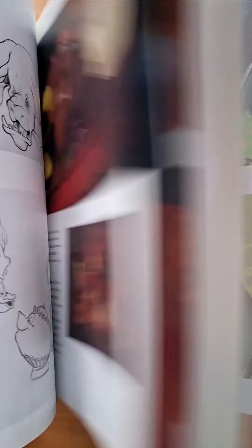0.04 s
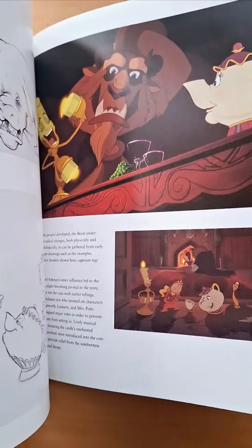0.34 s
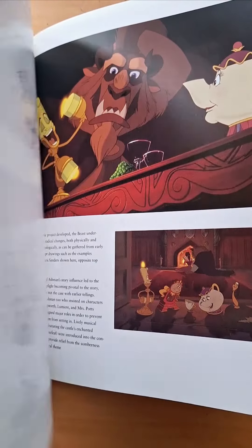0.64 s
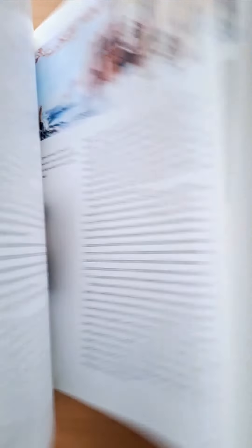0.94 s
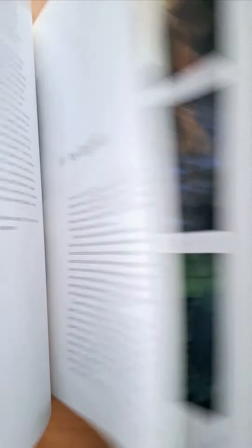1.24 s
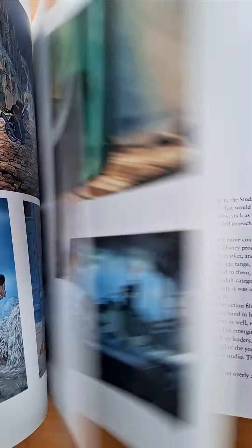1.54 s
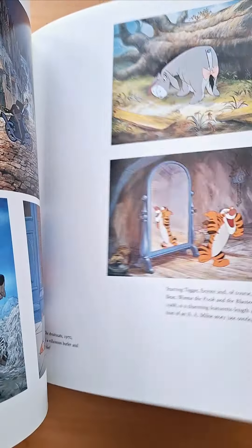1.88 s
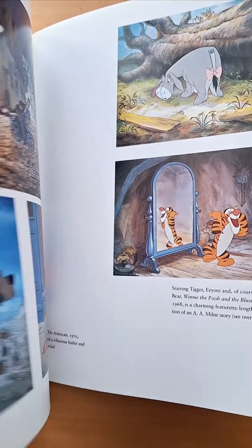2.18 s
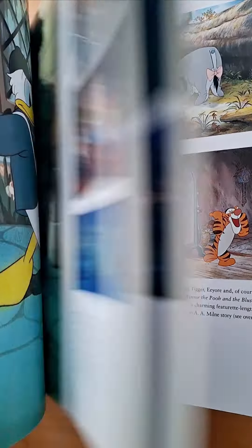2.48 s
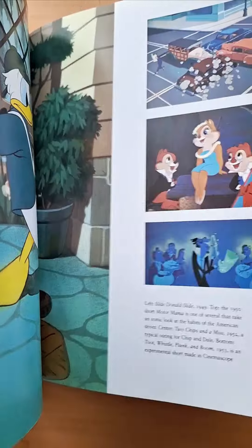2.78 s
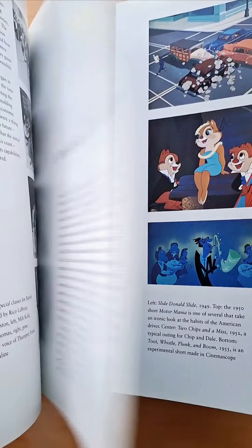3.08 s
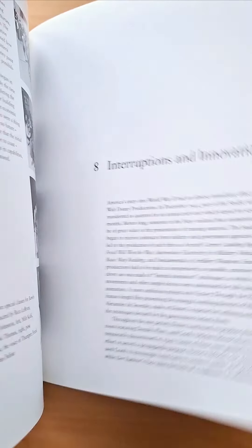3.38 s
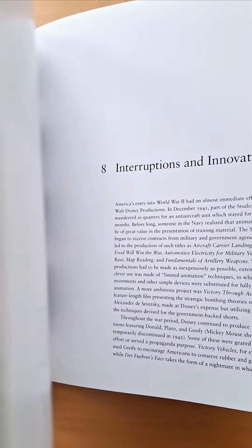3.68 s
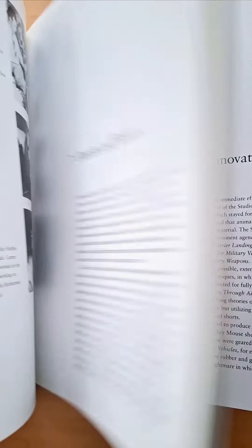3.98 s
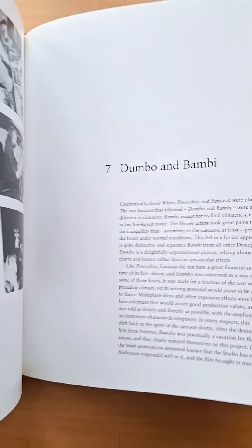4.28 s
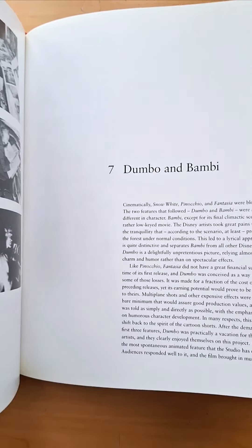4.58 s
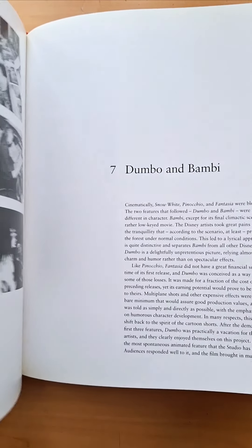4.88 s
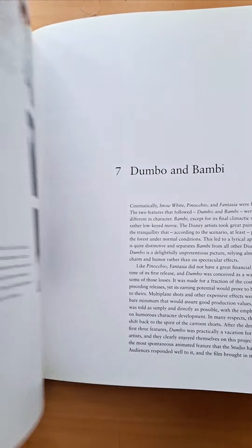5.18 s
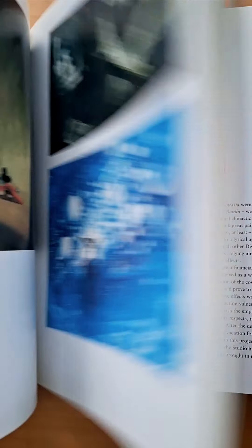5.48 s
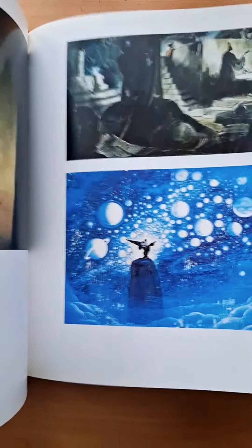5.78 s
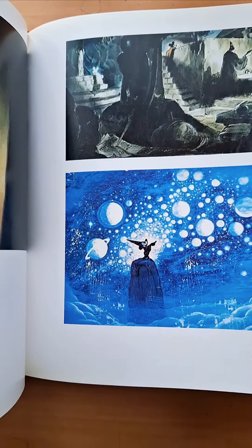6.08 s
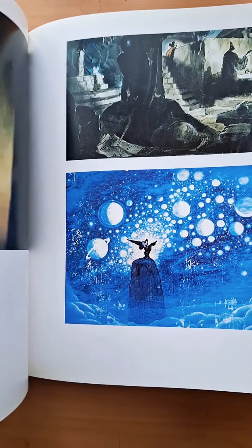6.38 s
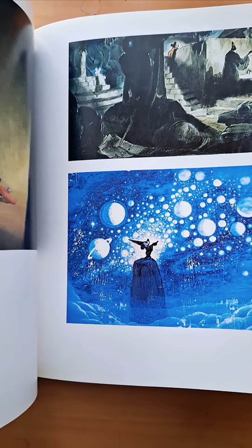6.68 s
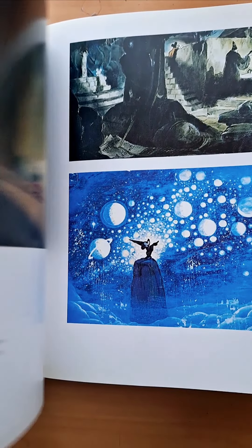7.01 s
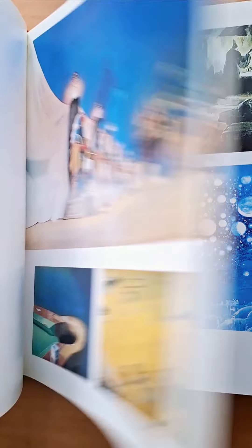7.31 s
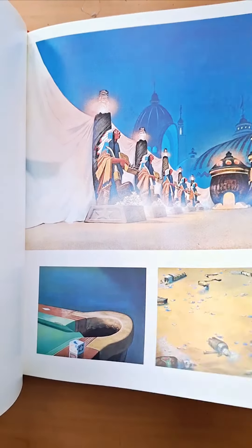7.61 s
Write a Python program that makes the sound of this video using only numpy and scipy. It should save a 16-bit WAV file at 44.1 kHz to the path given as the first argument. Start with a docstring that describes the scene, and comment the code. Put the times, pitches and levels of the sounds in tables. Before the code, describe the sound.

Stiff, glossy pages of a large book are turned close by, with papery swishes, hollow flaps, slaps and a couple of thumps.

```python
"""Hands leaf through a large book of stiff, glossy paper on a wooden table, close to the microphone.
A small room rumbles softly throughout. First a sheet slides with a hiss, swings through the air and
buckles with a hollow flap. Its edge ticks, it lands with a slap and a knock, and the book bumps the table.
More pages follow, some fluttering or rasping. Near 4.4 s and 5.9 s a bundle lands with a heavier thump,
and near 6.8 s a last sheet slides and ticks."""
import sys
import numpy as np
from scipy import signal
from scipy.fft import rfft, irfft, next_fast_len
from scipy.io import wavfile
from scipy.ndimage import uniform_filter1d, map_coordinates

SR = 44100
rng = np.random.default_rng(int(sys.argv[2]) if len(sys.argv) > 2 else 0)


def digitize_waveform(pressure):
    """Quantize a signal to 16-bit integers and store it at the path in sys.argv[1].

    Rows of a 2-D input are taken as channels; values are limited to [-1, 1].
    """
    field = np.atleast_2d(pressure).T
    bounded = np.clip(field, -1, 1)
    quanta = np.round(bounded * 32767).astype(np.int16)
    wavfile.write(sys.argv[1], SR, quanta)


N = 337365
HIT = int(.7 * SR)  # samples set aside for one short sound or echo
SLIDE_RELEASE_S, SWING_RISE_S = 0.055, .014  # time to fall 20 dB, time to climb 20 dB

# How alike left and right are (1 = the same) for rumble, paper and room air: pitch_hz, likeness
RUMBLE_LIKENESS = [(30, 0.87), (150, 1), (500, 0.61), (2000, 0.067), (10000, 0.042)]
PAPER_LIKENESS = [(300, 0.91), (750, 0.56), (1300, 0.24), (2500, 0.079), (12000, 0.087)]
ROOM_LIKENESS = [(150, 1), (700, 0.9), (1300, 0.046), (10000, 0.018)]


def amp(db):
    """Turn decibels into a gain to multiply by."""
    return 10 ** (np.asarray(db) / 20)


def unit(x):
    """Scale a sound to an average power of 1."""
    return x / np.sqrt(np.mean(x ** 2) + 1e-20)


def along(points, hz):
    """Read between (pitch_hz, value) points on a logarithmic pitch scale."""
    pitches, values = np.transpose(points)
    return np.interp(np.log(hz + 1), np.log(pitches + 1), values)


def wobble(rate):
    """A smooth random curve through rate points a second."""
    points = rng.standard_normal(int(N * rate / SR) + 4)
    return map_coordinates(points, [np.arange(N) * rate / SR])


def swell(start_s, rise_s, hold_s, release_s):
    """Gain of one movement: full at start_s, it climbs 20 dB per rise_s and falls 20 dB per release_s."""
    t = np.arange(N) / SR - start_s
    return amp(20 * (np.minimum(t, 0) / max(rise_s, 1e-3) - np.maximum(t - hold_s, 0) / release_s))


def filtered(x, response):
    """Multiply each frequency of a sound by response(hz)."""
    n = x.shape[-1]
    padded = next_fast_len(n + SR // 10)
    return irfft(rfft(x, padded) * response(np.fft.rfftfreq(padded, 1 / SR)), padded)[..., :n]


def coloured(x, colour):
    """Give a sound a tone colour made of (pitch_hz, level_db) points."""
    return filtered(x, lambda hz: amp(along(colour, hz)))


def noise(n, likeness):
    """White stereo noise whose two sides agree as far as likeness says."""
    def shares(hz):
        angle = np.arccos(np.clip(along(likeness, hz), -1, 1)) / 2
        return np.array([np.cos(angle), np.sin(angle)])
    mid, side = filtered(rng.standard_normal((2, n)), shares)
    return np.array([mid + side, mid - side])


def click(colour, size=2048):
    """The shortest click that has this tone colour."""
    cepstrum = irfft(np.log(amp(along(colour, np.fft.rfftfreq(size, 1 / SR)))))
    cepstrum[1:size // 2] *= 2  # folding it this way packs the energy at the start
    cepstrum[size // 2 + 1:] = 0
    return irfft(np.exp(rfft(cepstrum)))


def ring(modes, soft_hz, size=4096):
    """A few resonances answer one soft push, dulled above soft_hz."""
    f = np.fft.rfftfreq(size, 1 / SR)
    body = sum((-1) ** k * amp(db) * 1j * f * width / (hz * hz - f * f + 1j * f * width)
               for k, (hz, width, db) in enumerate(modes))
    return signal.sosfilt(signal.butter(4, soft_hz, fs=SR, output="sos"), irfft(body))


def linger(modes, onset_s=0.0046, blur=.005):
    """Wavering tones ring on after a blow; blur is their width as a share of their pitch."""
    t = np.arange(HIT) / SR
    tone = np.zeros(HIT)
    for hz, db, fade_60db_s in modes:
        wander = np.cumsum(rng.standard_normal(HIT)) * np.sqrt(2 * np.pi * blur * hz / SR)
        tone += amp(db - 60 * t / fade_60db_s) * np.sin(2 * np.pi * hz * t + wander)
    return np.tile(tone * (1 - np.exp(-t / onset_s)), (2, 1))


def strike(pulse, life_s, flutter, size=4096):
    """A push and the dying flutter after it, both with the tone of pulse."""
    age = np.arange(size) / SR / life_s
    shake = noise(size, PAPER_LIKENESS) * np.exp(-age) * (1 - np.exp(-4 * age))
    shake *= flutter / np.linalg.norm(shake[0])
    shake[:, 0] += 1  # the push
    sound = signal.fftconvolve(shake, pulse[None], axes=1)
    return sound / np.abs(sound.mean(0)).max()


def in_room(x, wet_db, near, build_s=0.0011, echoes=6):
    """Add close echoes off pages and table (gain near) and the room's fading tail (level wet_db)."""
    # How long the room rings: pitch_hz, fade_60db_s
    fade_times = [(100, 0.95), (300, 0.56), (1000, 0.42), (2000, 0.46), (4000, 0.43), (14000, 0.53)]
    hz, t, bands = signal.stft(noise(HIT, ROOM_LIKENESS), SR, nperseg=256)
    fading = bands * amp(-60 * t / along(fade_times, hz)[:, None])
    tail = signal.istft(fading * (1 - np.exp(-t / build_s)), SR, nperseg=256)[1]
    answer = amp(wet_db) * tail / np.linalg.norm(tail[0])
    answer[:, 0] += 1  # the direct sound
    for side in answer:
        delays = (rng.uniform(.0002, .004, echoes) * SR).astype(int)
        side[delays] += near * rng.choice([-1, 1], echoes)
    return signal.fftconvolve(x, answer, axes=1)


def off_centre(x, lead_s):
    """A sound from one side reaches the left channel lead_s before the right."""
    return filtered(x, lambda hz: np.exp(1j * np.pi * lead_s * np.outer([1, -1], hz)))


def add(track, start_s, sound):
    """Mix a sound into the track at a given time."""
    part = track[:, max(round(start_s * SR), 0):][:, :sound.shape[1]]
    part += sound[:, :part.shape[1]]


def room_tone(level_db=-59.5):
    """A low, gently heaving rumble under a faint hiss."""
    # Tone of the quiet room: pitch_hz, level_db
    room_colour = [(15, -24.5), (25, 1.5), (42, -9.5), (70, -6), (120, -12), (145, -8), (172, -1.5),
                   (215, -12.5), (260, -13.5), (370, -23.5), (480, -32), (820, -38), (1200, -42.5),
                   (3000, -45.5), (7700, -49.5), (8800, -51.5), (11000, -47.5), (15000, -47)]
    air = coloured(noise(N, RUMBLE_LIKENESS), room_colour)
    low = filtered(air, lambda hz: 1 / (1 + (hz / 400) ** 2))
    heave = amp(3 * wobble(11) - .5)
    return amp(level_db) * unit(air + low * (heave - 1))


def slide_gains(sag_db_per_s=18):
    """How strong the hiss and scrape are over time; the hiss thins as each sheet slows."""
    # Paper slides on paper: start_s, rise_s, hold_s, hiss_db, scrape_db
    strokes = [(0.0, .01, 0.043, -75, -73), (0.465, 0.049, 0.071, -53, -52.5),
               (0.817, 0.061, .07, -73, -76.5), (0.875, .012, .009, -62, -76),
               (0.918, 0.012, 0.044, -60, -57.5), (1.194, 0.11, 0.063, -69.5, -73),
               (1.268, 0.025, 0.015, -68, -71.5), (1.322, 0.019, 0.15, -66.5, -64),
               (1.589, 0.012, 0.014, -63, -81.5), (1.645, -0.04, 0.18, -74, -71.5),
               (2.118, 0.045, 0.027, -67.5, -81.5), (2.209, 0.005, 0.044, -56.5, -58),
               (2.281, 0.064, 0.03, -64.5, -56.5), (2.375, 0.017, 0.087, -79.5, -71),
               (2.87, 0.042, 0.0072, -51.5, -60), (2.95, 0.0175, 0.013, -56.5, -42.5),
               (3.55, 0.03, 0.026, -60.5, -67.5), (3.628, 0.025, 0.083, -58.5, -51),
               (4.258, 0.15, 0.33, -69, -68.5), (4.711, 0.067, 0.029, -63.5, -61),
               (4.813, 0.07, 0.014, -59, -60.5), (4.844, 0.01, 0.044, -68.5, -64.5),
               (4.929, 0.082, 0.0081, -67.5, -61.5), (4.996, 0.2, 0.19, -77, -72),
               (5.254, 0.047, 0.016, -70.5, -76), (5.307, 0.072, .09, -80.5, -74.5),
               (6.672, 0.41, 0.055, -84, -83), (6.797, 0.061, 0.036, -58.5, -61.5),
               (6.857, 0.095, 0.02, -51.5, -53)]
    t, hiss, scrape = np.arange(N) / SR, np.zeros(N), np.zeros(N)
    for start_s, rise_s, hold_s, hiss_db, scrape_db in strokes:
        stroke = swell(start_s, rise_s, hold_s, SLIDE_RELEASE_S)
        hiss += stroke * amp(hiss_db - sag_db_per_s * np.clip(t - start_s, 0, hold_s))
        scrape += stroke * amp(scrape_db)
    return hiss, scrape


def patchy(x, depth_db, size=1024):
    """Narrow resonances come and go as the sheet changes its bend."""
    bands = signal.stft(x, nperseg=size)[2]
    patches = uniform_filter1d(rng.standard_normal(bands.shape[1:]), size=3, axis=0)  # smooth in pitch
    patches = uniform_filter1d(patches, size=6, axis=1)  # and in time
    return signal.istft(bands * amp(depth_db * np.minimum(unit(patches), 2)), nperseg=size)[1][:, :N]


def friction(colour, slips_per_s, grain_share, spread_db):
    """Countless paper fibres catch and slip: a rush with single slips standing out."""
    slips = (rng.random(N) < slips_per_s / SR) * amp(spread_db * np.minimum(rng.standard_normal(N), 2))
    fade = np.exp(-np.arange(SR // 50) / SR / 0.0028)
    power = np.abs(signal.fftconvolve(slips ** 2, fade)[:N])
    rush = patchy(noise(N, PAPER_LIKENESS), depth_db=5)
    grains = rush * np.sqrt(1 - grain_share + grain_share * power / power.mean())
    return unit(coloured(grains, colour))


def slides(hiss_gain, scrape_gain):
    """A light touch hisses; pressing on the sheet adds a lower, crinkly scrape."""
    # Tone of light and of pressed sliding: pitch_hz, level_db
    hiss_colour = [(1500, -23), (3500, 2), (5000, -0.5), (7700, 1.5), (8800, -10), (11000, -4), (15000, -7)]
    scrape_colour = [(150, -25), (400, -2), (750, 3), (1000, 0), (1400, 0), (1800, 1), (2300, -1.5),
                     (3600, -7.5), (6000, -17), (15000, -23)]
    hiss = hiss_gain * friction(hiss_colour, slips_per_s=370, grain_share=0.81, spread_db=-2.0)
    scrape = scrape_gain * friction(scrape_colour, slips_per_s=150, grain_share=0.31, spread_db=-3.5)
    grip = amp(1.5 * wobble(60))  # the sheet catches and lets go
    return in_room(grip * (hiss + scrape), wet_db=-10.5, near=0.036)[:, :N]


def swings(release_s=0.052, settle_s=0.41):
    """A turning sheet wobbles softly and fans a slowly settling draught over the microphone."""
    # A sheet swings through the air: start_s, hold_s, wobble_db, draught_db
    turns = [(0.278, 0.24, -66, -58.5), (0.445, 0.041, -39, -56), (1.159, 0.097, -52, -63),
             (1.309, 0.12, -51, -58.5), (1.472, 0.028, -50.5, -58), (1.579, 0.13, -52.5, -55),
             (1.73, 0.1, -62, -58.5), (1.868, 0.14, -56, -82), (2, 0.033, -52, -67),
             (2.089, 0.012, -57, -57), (2.883, 0.048, -60.5, -66), (2.937, 0.024, -48.5, -47),
             (3.461, 0.07, -49.5, -66.5), (3.624, 0.017, -45.5, -52), (4.4, 0.033, -60, -51.5),
             (5.843, 0.056, -61.5, -71.5), (5.947, 0.036, -42.5, -50), (6.76, 0.054, -63, -72.5)]
    # Tone of the wobbling sheet and of air on the microphone: pitch_hz, level_db
    sheet_colour = [(60, -6.5), (110, -19.5), (220, -0.5), (350, 2), (580, -2.5), (790, -4.5),
                    (1000, -18.5), (1500, -24), (2500, -46), (6000, -82.5)]
    draught_colour = [(12, -27), (25, -3.5), (60, -9.5), (100, -14), (200, -36.5), (600, -59.5)]
    motion = sum(amp(db) * swell(s, SWING_RISE_S, hold_s, release_s) for s, hold_s, db, _ in turns)
    breeze = sum(amp(db) * swell(s, SWING_RISE_S, hold_s, settle_s) for s, hold_s, _, db in turns)
    sheet = unit(coloured(noise(N, ROOM_LIKENESS), sheet_colour))
    draught = breeze * unit(coloured(noise(N, RUMBLE_LIKENESS), draught_colour))
    waver = amp(0.35 * wobble(70) - 2.0)
    return draught + in_room(motion * waver * sheet, wet_db=-5.0, near=0.015)[:, :N]


def flap(ring_hz, ring_db, thump_db, crack_db, life_s):
    """One flap: the sheet rings hollow, pushes air against the book and cracks."""
    # Resonances of the bent sheet: pitch_times_ring_hz, width_times_ring_hz, level_db
    sheet_modes = [(.5, 0.2, -12.5), (.82, 0.055, -4.5), (.94, 0.076, -2.5), (1.04, 0.099, 0),
                   (1.42, 0.14, -8.5), (1.85, 0.16, -19.5)]
    # Resonances of the block of pages and the air under it: pitch_hz, width_hz, level_db
    book_modes = [(63.5, 25, -3.5), (139.4, 27.5, 1), (226.6, 21, 0), (314.4, 43, 1)]
    # Tone of the crack: pitch_hz, level_db
    crack_colour = [(400, -34), (900, -20), (1300, -2.5), (2000, -11), (3000, -23), (6000, -31.5),
                    (15000, -44)]
    sheet = ring([(pitch * ring_hz, width * ring_hz, db) for pitch, width, db in sheet_modes], 1450)
    hollow = amp(ring_db - 5.0) * strike(sheet, life_s, flutter=1.0)
    thump = amp(thump_db - 1.5) * strike(ring(book_modes, soft_hz=503), life_s, flutter=0.36)
    crack = amp(crack_db - 7.0) * strike(click(crack_colour, size=4096), life_s, flutter=3.7)
    return in_room(hollow + thump, wet_db=-5.5, near=0.21) + in_room(crack, wet_db=-2.5, near=0.095)


def buckles():
    """A lifted sheet flips its bend with a single flap."""
    # Flaps in mid-air: start_s, level_db, pitch_hz, thump_offset_db, crack_offset_db
    flips = [(0.289, -55, 697, 6.5, -27), (0.92, -44.5, 700, 2, -1), (1.165, -47, 726, 6, -7),
             (1.312, -39.5, 650, 1, -9), (1.488, -37, 718, -4.5, -14), (1.586, -32, 703, -2.5, -12.5),
             (1.926, -41, 688, -3, -18), (2.006, -39, 682, -7.5, -17), (2.096, -35.5, 745, -12, -12),
             (2.124, -40, 857, -8, -13), (2.9441, -35, 690, 3.5, -13), (3.467, -37.5, 774, -4, -28),
             (3.52, -36, 822, -10, -16), (4.808, -51.5, 980, -8, 8), (5.111, -54.5, 600, -10, 2.5),
             (6.851, -46, 840, -21, -16.5)]
    out = np.zeros((2, N))
    for start_s, db, hz, thump_db, crack_db in flips:
        add(out, start_s, flap(hz, db, db + thump_db, db + crack_db, life_s=0.014))
    return out


def stray_ticks(hiss_gain, tries_per_s=7.2, least_hiss_db=-76.5, bright_hz=5850, snap_db=-6):
    """Extra rows for ticks(): chance ticks, as strong as the sliding that sheds them."""
    rows = []
    for when, size, side in rng.random((int(tries_per_s * N / SR), 3)):
        at = int(when * N)
        hiss_db = 20 * np.log10(hiss_gain[at] + 1e-9)
        if hiss_db > least_hiss_db:
            level_db = hiss_db + 6 + 4.5 * (2 * size - 1)
            pan_db = -5.5 * (2 * side - 1)
            rows.append((at / SR, level_db, bright_hz, snap_db, pan_db))
    return rows


def ticks(hiss_gain):
    """A stiff edge slips off a finger or another page in a tiny burst of cracks."""
    # An edge flicks free: start_s, level_db, bright_hz, snap_offset_db, left_over_right_db
    flicks = [(.443, -46.5, 7500, -22.5, -4), (0.4599, -35, 4460, 7.5, -7), (0.922, -38, 4330, -16, -14.5),
              (0.9765, -36, 4450, -7.5, 2), (1.2548, -44.5, 6590, -27, -1), (1.2662, -36, 6440, -25, 1),
              (1.278, -43, 6500, -24, -1), (1.4042, -36.5, 6570, -20, -6), (1.4201, -33, 6750, -18, -1),
              (2.108, -47, 7100, -23, 6), (2.21, -41, 4780, -20, 2), (2.331, -45, 4500, -8, -3),
              (2.872, -37.5, 4020, -4.5, -17), (2.9439, -38, 4200, -6, 3.5), (2.962, -37.5, 3546, -5, 2),
              (3.529, -42, 10000, -15, -5), (3.5575, -42.5, 7500, -8, -7), (3.675, -39, 4800, -3, -5),
              (3.7085, -37.5, 6500, -1.5, -7), (4.403, -36, 5660, -14, 2.5),
              (4.6886, -46.5, 7640, -22, -11), (4.6993, -45, 7000, -18, 11), (4.7182, -41, 6600, -10, -7),
              (4.742, -38.5, 6500, -18, -7), (4.748, -41, 6000, -18, -1), (4.81, -42, 5000, 1, 2.5),
              (4.85, -48.5, 4500, -1, -1.5), (4.929, -41.5, 7800, -4, -4.5), (5.9421, -39.5, 5500, 4, 0.5),
              (6.7935, -29, 8000, -11, -5), (6.799, -37.5, 7700, -12, -5.5), (6.8598, -32, 5360, 1, -1)]
    # Tone of the bright rim: pitch_times_bright_hz, level_db
    edge_colour = [(.25, -33), (.6, -3.5), (1, 2.5), (1.3, -3.5), (1.999, -10), (3.5, -8)]
    # Tone of the lower snap of the sheet behind it: pitch_hz, level_db
    snap_colour = [(600, -51), (1500, -9.5), (2500, 2), (3800, 0), (6000, -10), (15000, -55)]
    out, snap = np.zeros((2, N)), click(snap_colour)
    for start_s, db, bright_hz, snap_db, pan_db in flicks + stray_ticks(hiss_gain):
        edge = click([(multiple * bright_hz, level) for multiple, level in edge_colour])
        burst = strike(edge, life_s=0.0016, flutter=9)
        burst += amp(snap_db) * strike(snap, life_s=0.0039, flutter=5.7)
        pan = amp([[pan_db / 2], [-pan_db / 2]])
        add(out, start_s, amp(db - 7.5) * pan * in_room(burst, wet_db=-5.5, near=0.21))
    return out


def landings(contacts=4, cushion_db=-7.5, thump_loss_db=5, crack_loss_db=3, afterring_db=-18.5):
    """Pages thump on a cushion of air, slap down and patter to rest; the table and room ring on."""
    # Pages land: start_s, level_db, pitch_hz, thump_offset_db, crack_offset_db, gap_s, ring_loss_db
    falls = [(0.4461, -30, 730, -6, -7.5, 0.011, -1), (1.321, -34.5, 666, -17, -11, 0.0089, 1),
             (1.597, -34.5, 774, -2.5, -6.5, .0095, 5), (2.951, -29.5, 722, -13, -8, 0.0069, -2),
             (3.6313, -29.5, 808, -15.5, -10.5, .012, 8), (4.4, -25.5, 679, 0, -8.5, 0.0128, 5),
             (5.939, -20.5, 787, 2.5, -4.5, 0.012, 5)]
    # Resonances of the table and room that ring on after a landing: pitch_hz, level_db, fade_60db_s
    afterring_modes = [(68.9, -5, 0.59), (151.2, -6, 0.32), (212, 0, 0.5), (307.5, -1.5, 0.48),
                       (387, -4.5, 0.57), (445, -8, 0.22), (639, -4.5, 0.19), (781, -20.5, 0.46),
                       (950, -12.5, 0.62), (1125, -9.5, 0.33), (1290, -18, 0.21), (1510, -13.5, 0.45),
                       (1720, -17.5, 0.64), (1981, -22, .35)]
    out = np.zeros((2, N))
    for start_s, db, hz, thump_db, crack_db, gap_s, ring_loss_db in falls:
        for k in range(contacts):
            # trapped air softens the ring and crack of the first contact
            ring_level = db + (-ring_loss_db * (k - 1) if k else cushion_db)
            crack_level = db + crack_db + (-crack_loss_db * (k - 1) if k else cushion_db)
            thump_level = db + thump_db - thump_loss_db * k
            ring_hz = hz * (1 + 0.039 * (k - 1))  # climbs as the pocket of air flattens
            contact = flap(ring_hz, ring_level, thump_level, crack_level, life_s=.0055)
            add(out, start_s + k * gap_s, contact)
        add(out, start_s, amp(db + thump_db + afterring_db) * linger(afterring_modes))
    return out


def slaps():
    """Flat paper hits flat paper with one dry, sharp smack."""
    # A sheet hits the next: start_s, level_db
    smacks = [(0.4591, -17.5), (1.613, -40), (2.9442, -38), (2.972, -28.5), (3.671, -35)]
    # Tone of the smack: pitch_hz, level_db
    smack_colour = [(150, -6.5), (600, -1.5), (1000, -1.5), (2200, -5), (3500, -21), (7000, -28.5),
                    (15000, -36.5)]
    out = np.zeros((2, N))
    for start_s, db in smacks:
        smack = strike(click(smack_colour), life_s=0.0035, flutter=0.47)
        add(out, start_s, amp(db) * in_room(smack, wet_db=-7.5, near=.1))
    return out


def knocks(pan_db=1.5):
    """Air squeezed from between two sheets sings for a few cycles: a hollow knock."""
    # Pockets of air close: loudest_s, level_db, pitch_hz, half_length_s
    pockets = [(0.467, -32, 756, .008), (.4868, -35, 717, .005), (0.504, -34.5, 743, 0.0065),
               (1.615, -41, 933, 0.0087), (2.9606, -31, 728, .004), (2.971, -28, 747, .005),
               (3.4765, -38, 770, .005), (3.6455, -30, 796, .005), (4.4146, -30, 715, 0.0036),
               (4.4297, -33.5, 728, .003)]
    out, t = np.zeros((2, N)), np.arange(4096) / SR
    pan = amp([[pan_db / 2], [-pan_db / 2]])
    for loudest_s, db, hz, half_s in pockets:
        gain = amp(db) * np.exp(-(t / half_s - 2) ** 2)
        tone = gain * np.sin(2 * np.pi * (hz * t + rng.random()))
        add(out, loudest_s - 2 * half_s, in_room(tone * pan, wet_db=-14, near=.04))
    return out


def bumps(fade_60db_s=0.22):
    """The heavy book rocks dully on the table for a few cycles after each nudge."""
    # The hands shift the book: start_s, level_db, pitch_hz
    nudges = [(.468, -36, 61), (0.602, -47, 58), (0.734, -43.5, 58.7), (1.324, -42, 77.3),
              (1.476, -34.5, 48.6), (1.69, -42, 62.2), (2.025, -39, 72.4), (2.951, -41.5, 74.8),
              (3.624, -40, 62), (4.511, -44, 62.4), (5.836, -42, 162.5), (6.162, -37.5, 66),
              (7.178, -47.5, 64.6)]
    out = np.zeros((2, N))
    for start_s, db, hz in nudges:
        add(out, start_s, linger([(hz, db, fade_60db_s)], onset_s=0.0076))
    return out


def flutters(contacts_per_s=95, depth_db=4, release_s=0.033):
    """Loose sheets touch quickly and unevenly, which runs together into a papery burr."""
    # Sheets flutter: start_s, hold_s, level_db, pitch_hz
    bursts = [(1.209, 0.034, -56.5, 756), (1.331, 0.044, -50, 990), (1.605, 0.034, -47, 1000),
              (2.004, 0.058, -54.5, 910), (2.098, 0.024, -51.5, 1050), (3.659, 0.019, -45, 1150)]
    # Tone of the burr: multiple_of_pitch, level_db
    burr_colour = [(.15, -13), (.35, -0.5), (.52, -3.5), (.7, -2), (1, -1.5), (1.3, -5.5), (2, -24),
                   (3, -47), (8, -52)]
    out = np.zeros((2, N))
    for start_s, hold_s, db, hz in bursts:
        colour = [(multiple * hz, level) for multiple, level in burr_colour]
        body = coloured(noise(HIT, PAPER_LIKENESS), colour)
        cycles = contacts_per_s * np.arange(HIT) / SR + np.cumsum(rng.normal(0, 0.014, HIT))
        burr = unit(body * amp(depth_db * np.cos(2 * np.pi * cycles)))
        gain = amp(db) * swell(SWING_RISE_S, SWING_RISE_S, hold_s, release_s)[:HIT]
        add(out, start_s - SWING_RISE_S, in_room(gain * burr, wet_db=-8.5, near=0.087))
    return out


def rasps(sink_octaves_per_s=5.3, width_hz=370, rise_s=0.0098):
    """Rubbing makes a bent sheet rasp at one pitch, which sinks as the bend opens."""
    # A sheet rasps: start_s, hold_s, first_pitch_hz, level_db
    rubs = [(2.21, 0.053, 1360, -63), (2.255, 0.038, 2630, -55.5), (2.271, 0.031, 2010, -59),
            (4.793, 0.053, 2700, -57.5), (4.921, 0.03, 1684, -68), (6.833, 0.031, 2740, -47)]
    out, t = np.zeros((2, N)), np.arange(HIT) / SR
    for start_s, hold_s, first_hz, db in rubs:
        roughness = unit(filtered(noise(HIT, PAPER_LIKENESS), lambda f: 1 / (1 + (2 * f / width_hz) ** 4)))
        hz = first_hz * 2 ** (-sink_octaves_per_s * np.clip(t - rise_s, 0, hold_s))
        tone = np.sin(2 * np.pi * np.cumsum(hz) / SR)
        gain = amp(db) * swell(rise_s, rise_s, hold_s, SLIDE_RELEASE_S)[:HIT]
        add(out, start_s - rise_s, gain * unit(roughness * tone))
    return out


def scene():
    """The book in its room: pages are picked up on the right and fall to the left."""
    hiss_gain, scrape_gain = slide_gains()
    turning = swings() + buckles() + landings() + knocks() + slaps() + flutters()
    handling = slides(hiss_gain, scrape_gain) + rasps() + ticks(hiss_gain)
    paper = off_centre(turning, lead_s=0.00014) + off_centre(handling, lead_s=-0.0001845)
    return paper + bumps() + room_tone()


def record(dry, top_hz=15800):
    """The microphone's two sides each have their own tone and keep nothing above top_hz."""
    # Balance of the two sides: pitch_hz, left_over_right_db
    balance = [(30, 4.5), (120, 4), (300, -0.5), (750, 4.5), (1300, 4.5), (2800, 2), (8000, 2.5),
               (13000, -2.5)]
    return filtered(dry, lambda hz: amp(np.outer([1, -1], along(balance, hz)) / 2) * (hz < top_hz))


dry = scene()
out = record(dry)
digitize_waveform(out)
```